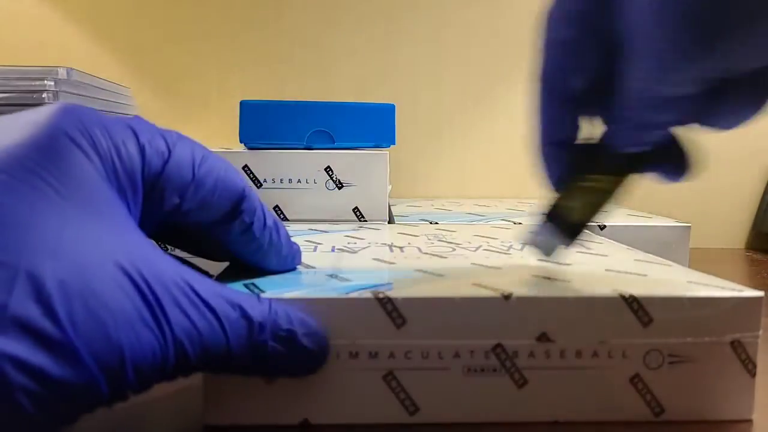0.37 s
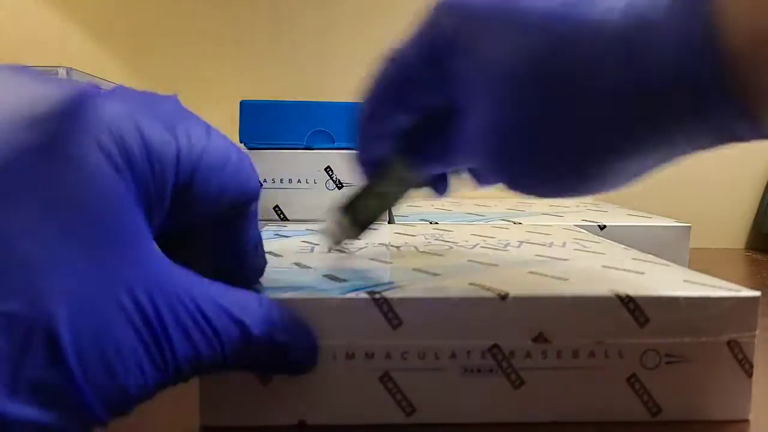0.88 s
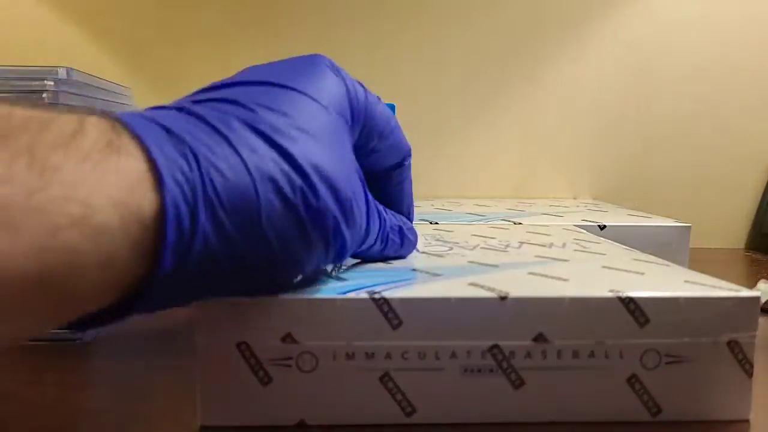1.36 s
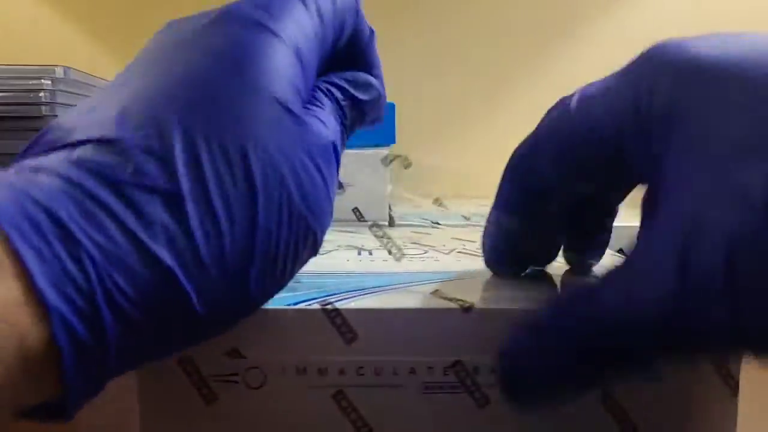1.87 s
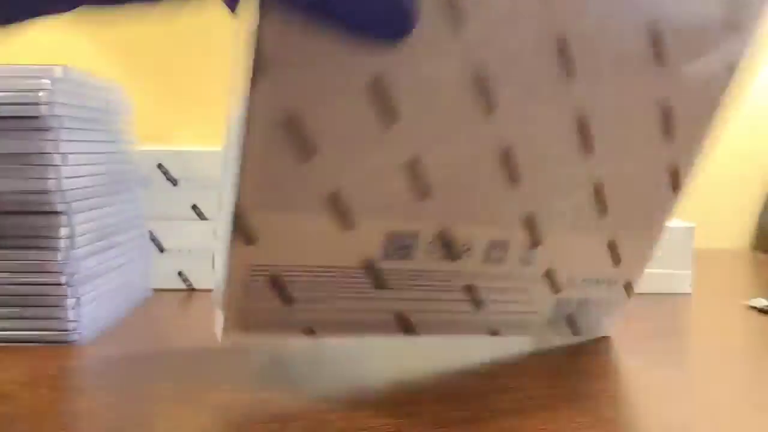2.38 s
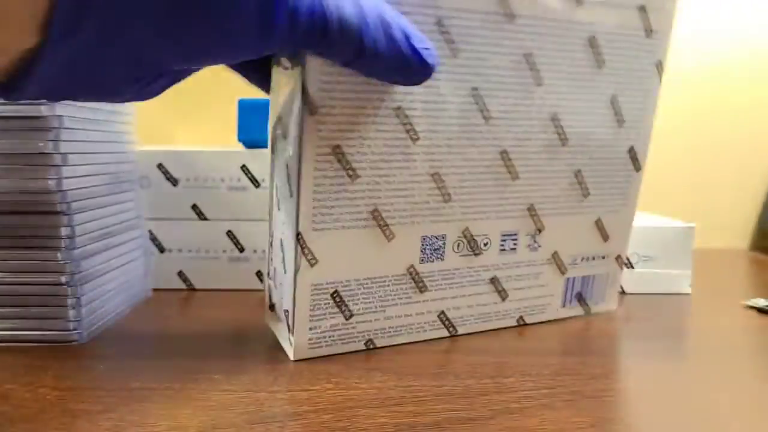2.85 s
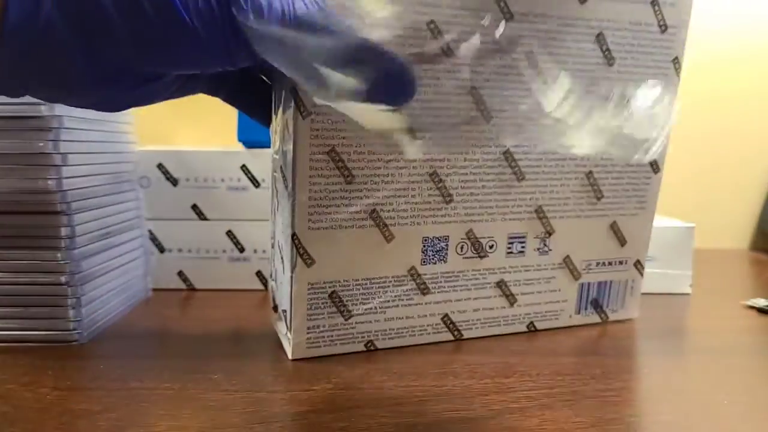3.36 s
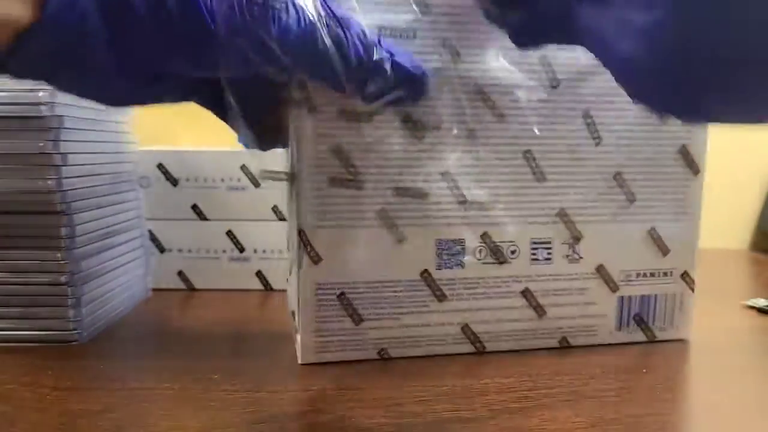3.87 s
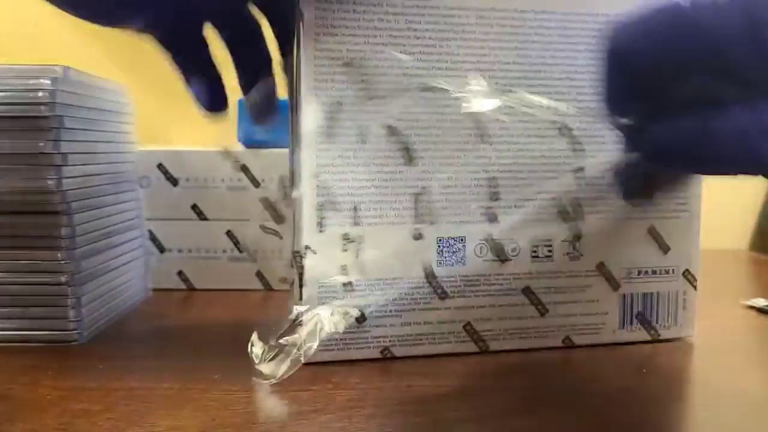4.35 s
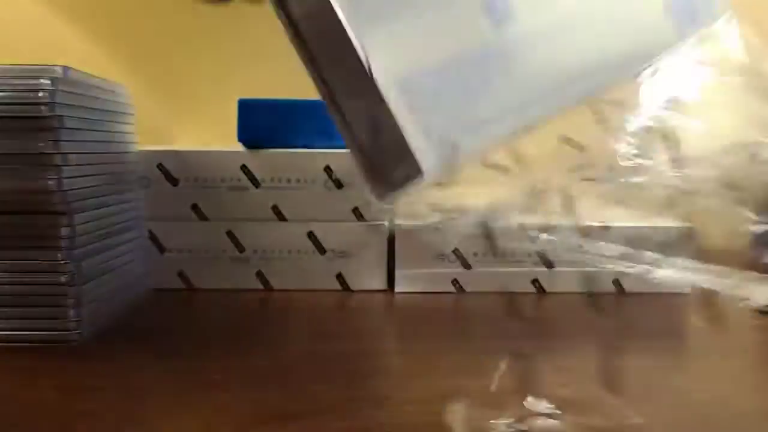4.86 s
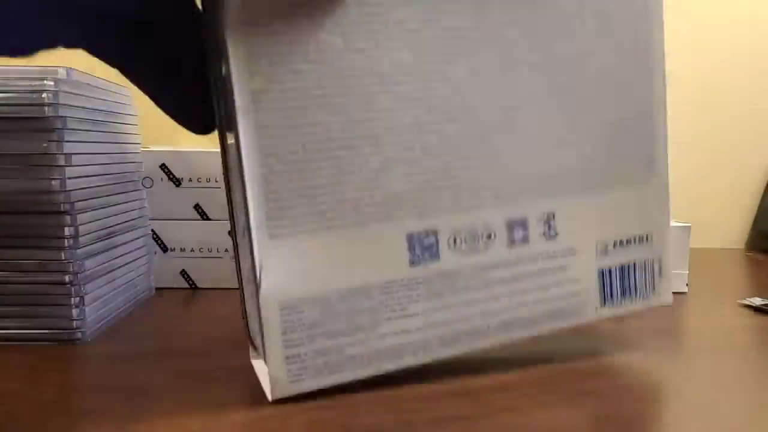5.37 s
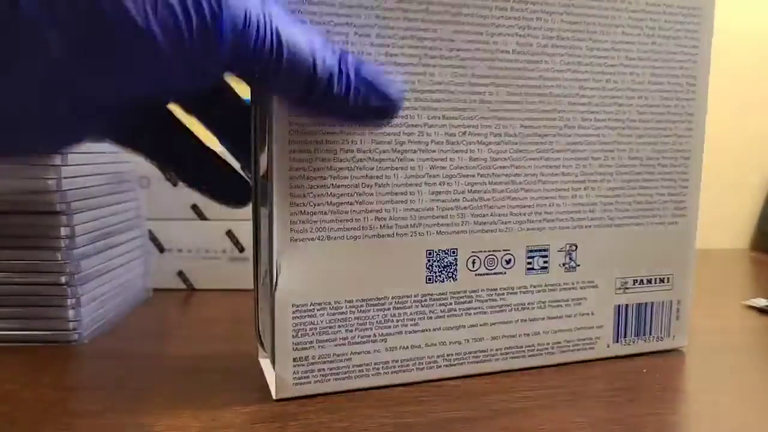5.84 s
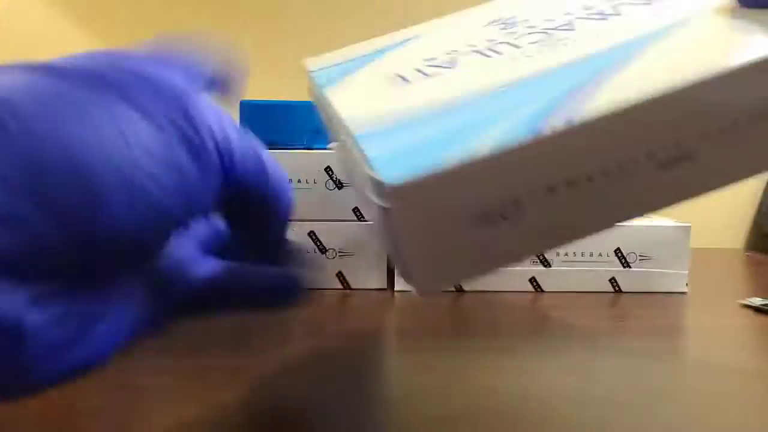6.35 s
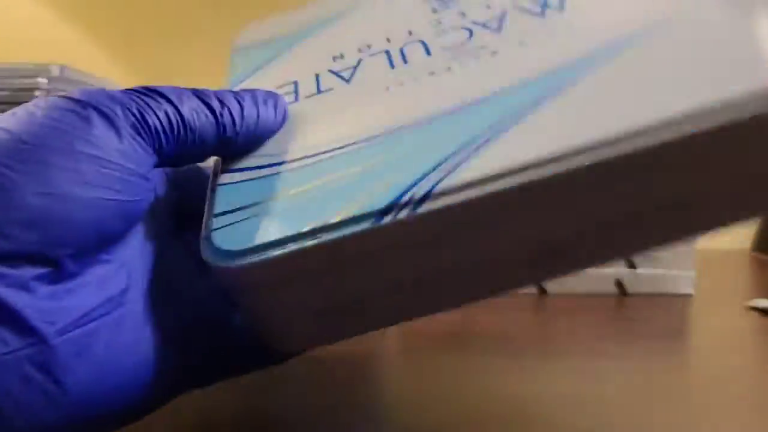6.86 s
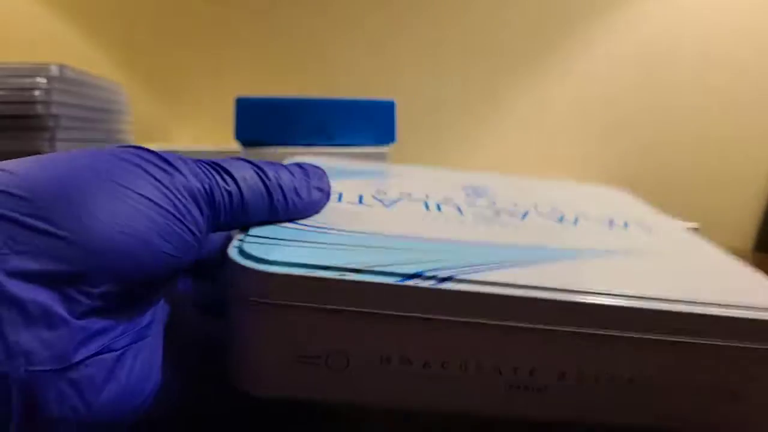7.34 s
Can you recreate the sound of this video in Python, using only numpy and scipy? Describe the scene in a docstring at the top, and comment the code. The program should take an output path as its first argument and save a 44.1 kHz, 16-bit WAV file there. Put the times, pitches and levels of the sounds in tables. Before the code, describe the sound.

A close, dry indoor unwrapping on a wooden desk, with a short small-room echo and faint steady air. A blade drags over plastic film at 0.15-0.5 s, a gritty rasp drumming the hollow box, and again, shorter, at 0.85-1.05 after a knock. Sharp film snaps burst at 1.4, then thin rustle and small crackles continue to 2.1, where snaps cluster with a tiny squeak. The box knocks dully at 2.55; bright pops follow at 2.35 and 2.75-2.85. Lighter crinkles and a faint creak at 3.5 lead to stronger pulls and cracks at 3.75, 4.1, 4.35, 4.5 and 4.9. Rustle thins by 5.5, leaving soft glove rubs and light taps around 6.1-6.3. A card sleeve scrapes off at 6.65-6.9, ending in a bump. The tin lands at 7.4 and 7.5, two bright, hard clacks with short clatter, then a brief hissing slide.

```python
"""Unwrapping a boxed tin

Gloved hands unwrap a tin in a card sleeve on a wooden desk, close to a small microphone.
A blade scores the plastic film twice; the film is pulled off with snaps and rustle, the box knocks
on the desk, the sleeve slides off and the tin is set down, edge first, with a short slide on the desk.
Rubs are filtered noise and tiny slips, blows are fading noise bursts, squeaks are gliding tones; a
small room answers.
"""
import sys
import numpy as np
from scipy import signal
from scipy.io import wavfile
from scipy.ndimage import uniform_filter1d

SR = 44100
rng = np.random.default_rng(int(sys.argv[2]) if len(sys.argv) > 2 else 0)


def amplitude_ratio(level_db):
    """Convert a level in decibels to the matching linear amplitude (field) ratio."""
    exponent = np.asarray(level_db, float) / 20
    return 10 ** exponent


def generate_wav(signal):
    """Clip the signal to [-1, 1] and save it as 16-bit WAV at the path in sys.argv[1]."""
    frames = np.transpose(np.atleast_2d(signal))
    scaled = np.clip(frames, -1, 1) * 32767
    pcm = np.round(scaled).astype(np.int16)
    wavfile.write(sys.argv[1], SR, pcm)


N = 340452  # length in samples

# Held strokes of blade, film and sleeve: touch t/s, lift t/s, build-up time/s of the drumming,
# surface hiss level/dB, box drumming level/dB
BLADE_STROKES = [(0.142, 0.47, 0.072, -23.5, -22.5), (0.85, 1.06, 0.028, -25.5, -25)]
FILM_STROKES = [(1.378, 1.48, 0.0021, -31, -39), (3.03, 3.205, 0.0064, -45.5, -51.5),
                (3.736, 3.875, 0.002, -37.5, -37.5), (3.91, 4.06, 0.011, -38.5, -41.5),
                (4.083, 4.145, 0.0018, -24, -33), (4.755, 4.9, 0.012, -31.5, -37.5),
                (4.95, 5.115, 0.0091, -42.5, -49), (5.29, 5.465, 0.0048, -40.5, -53)]
SLEEVE_STROKES = [(6.66, 6.9, 0.026, -27, -29.5)]
# How held strokes end: time/s to fall 20 dB after the lift, change of drumming level/dB along the stroke
BLADE_END = (0.015, -3)
FILM_END = (0.035, -0.66)
SLEEVE_STOP = (0.0056, -19)
# Short rubs of film, of sleeve and desk, and of gloves: peak t/s, time/s of a 20 dB rise, time/s of a
# 20 dB fall (zero, negative or smaller times are played as 0.002 s),
# surface hiss level/dB, box drumming level/dB
FILM_RUBS = [(1.317, 0.11, 0.35, -55, -41), (1.47, -0.0147, 0.04, -32.5, -43), (1.56, 0.53, 0, -52.5, -56),
             (1.674, -0.03, 0, -35, -36), (1.74, 0.43, 0.14, -45.5, -50.5), (1.88, 1, 0.5, -54, -57),
             (1.96, 0.14, 0.15, -49, -40.5), (2.02, 0.05, 0.24, -43.5, -40),
             (2.096, -0.0248, 0.08, -38, -34.5), (2.25, 0.45, 0, -48.5, -47),
             (2.345, 0.09, 0.1, -39, -35.5), (2.7, 1.5, 0.15, -50.5, -54), (2.85, 0.1557, 0.05, -29.5, -34),
             (3.078, 1.2, -0.45, -46.5, -53), (3.342, 0.07, 1.5, -55.5, -53),
             (3.462, -0.0643, 0, -38.5, -33.5), (3.504, 0.08, 0.07, -39, -49), (3.64, 0.2, 1.3, -50, -50.5),
             (4.23, 0, 1.5, -43.5, -47), (4.37, 0.11, 0.18, -35.5, -35.5), (4.5, -0.0953, 0.08, -23, -29),
             (4.6, 0.5, 0.3, -38.5, -48.5), (4.906, -0.03, 0.0429, -21, -29)]
SLIDE_RUBS = [(6.65, 0.074, 0.03, -38.5, -44), (6.91, 0.023, 0.02, -54.5, -19),
              (7.53, 0.023, 0.13, -34, -17), (7.55, .02, 0.1, -50, -24)]
GLOVE_RUBS = [(0.05, 0.057, 0.081, -80, -49.5), (0.56, 0.084, 0.069, -61, -50.5),
              (1.28, 0.14, 0.015, -64, -53.5), (5.608, 0.0085, 0.05, -54.5, -48.5),
              (5.736, 0.052, 0.05, -48, -50.5), (5.83, 0.046, 0.036, -49, -49.5),
              (5.914, 0.15, 0.082, -52.5, -49), (6.12, 0.011, 0.046, -49, -35.5),
              (6.218, 0.0076, 0.12, -41.5, -36.5), (6.52, 0.09, 0.069, -48.5, -52.5),
              (6.96, 0.027, 0.032, -63, -40), (7.03, 0.08, 0.32, -52, -54.5),
              (7.326, 0.033, 0.083, -58, -51)]
# Colour of each material and of the room air, before the overall level is set: f/Hz, relative level/dB
BLADE_COLOUR = [(24, -116), (40, -76.5), (85, -10), (222, -4.5), (391, -5), (670, -4), (758, -6.5),
                (1360, -8.5), (1740, -11.5), (3910, -15), (8580, -28.5), (14000, -27.5)]
PLASTIC_COLOUR = [(24, -9), (40, 0.5), (79, 9.5), (306, 2), (372, 0), (654, -2.5), (721, 0), (1040, -5),
                  (2340, -11), (7050, -11.5), (8790, -19), (14000, -10)]
SLIDE_COLOUR = [(24, -65), (40, 1), (136, -5.5), (183, -4.5), (313, 4), (464, -3.5), (538, -4.5), (721, -5),
                (1330, -8.5), (1740, -9.5), (3220, -6.5), (7000, -10), (8600, -19), (14000, -14.5)]
TIN_COLOUR = [(35, -76), (72, -20.5), (258, -8), (317, -7), (658, -10), (866, -18.5), (970, -9.5),
              (1110, -10.5), (1400, -12), (2470, -22.5), (6160, -34.5), (7060, -34.5), (8100, -44),
              (14000, -39.5)]
AIR_COLOUR = [(15, -47.5), (25, 6.5), (80, 9.5), (164, -10.5), (649, -15), (2080, -24), (4850, -15),
              (8470, -27.5), (12600, -32), (14000, -8)]
# Walls and air of the box, each sound takes its own share of the lift: f/Hz, width/Hz, lift level/dB
BOX_MODES = [(127.8, 8.3, 3.5), (236.8, 45, 6.5), (318, 22, 8), (409, 7.3, 1.5), (518, 82, 6),
             (665, 81, 7.5), (986, 81, 5), (1360, 390, 5.5), (1947, 24, 7.5)]
# Creases of film snapping: t/s, level/dB, centre f/Hz
FILM_SNAPS = [(0.0266, -38, 4000), (0.3186, -18, 1660), (0.602, -24, 12800), (0.7932, -19.5, 1630),
              (0.9718, -17, 1300), (1.3165, -16, 1640), (1.345, -19, 1930), (1.3814, -2.5, 3000),
              (1.3987, -1, 3100), (1.443, -5.5, 3970), (1.5726, -19, 12400), (1.6621, -20.5, 8100),
              (1.673, -22, 1990), (1.686, -22, 4500), (1.915, -34.5, 2500), (1.9494, -28.5, 2800),
              (2.0038, -22.5, 3430), (2.0535, -20, 3490), (2.08, -9, 12300), (2.090, -19, 6000),
              (2.0992, -7.5, 3850), (2.1232, -14.5, 4080), (2.159, -27, 1290), (2.181, -32, 9000),
              (2.219, -34.5, 6000), (2.315, -28, 2200), (2.3554, -8.5, 3160), (2.379, -25, 6000),
              (2.448, -31, 3800), (2.487, -30, 7000), (2.572, -21, 3260), (2.669, -18, 12700),
              (2.709, -26.5, 4560), (2.7588, -7, 1410), (2.809, -34, 1490), (2.835, -14.5, 5000),
              (2.843, -5.5, 7200), (2.9, -23, 8000), (2.946, -25, 12600), (2.971, -29, 9200),
              (3.017, -32, 9000), (3.053, -24.5, 1520), (3.068, -12.5, 13000), (3.085, -17, 6200),
              (3.171, -36, 5400), (3.193, -28, 3980), (3.293, -40, 5040), (3.3074, -32, 6100),
              (3.327, -36, 3100), (3.535, -30, 3160), (3.605, -25, 12800), (3.6339, -20.5, 12200),
              (3.647, -28.5, 2000), (3.737, -13, 6750), (3.756, -17.5, 1500), (3.765, -11, 6840),
              (3.78, -19, 3300), (3.811, -13.5, 4670), (3.867, -17, 1490), (3.968, -24, 2540),
              (3.934, -22.5, 5370), (3.9493, -24.5, 1500), (3.999, -35, 9000), (4.022, -24, 2230),
              (4.0343, -11.5, 11900), (4.076, -15.5, 3000), (4.0828, -1.5, 2470), (4.142, -8.5, 3380),
              (4.204, -11, 12900), (4.2847, -25, 3350), (4.31, -24, 2500), (4.325, -31, 4000),
              (4.3328, -1.5, 2410), (4.368, -18.5, 1510), (4.435, -21, 4500), (4.481, 2, 5070),
              (4.641, -36, 8000), (4.657, -27.5, 4000), (4.6937, -21, 1440), (4.738, -24, 4070),
              (4.763, -24, 5200), (4.8645, -17.5, 3760), (4.901, -10.5, 6950), (4.981, -27, 10000),
              (4.994, -34, 7000), (5.019, -18, 11700), (5.107, -19, 12700), (5.215, -19.5, 12300),
              (5.252, -28, 12400), (5.297, -31.5, 3670), (5.3295, -16.5, 12600), (5.386, -23.5, 12800),
              (5.456, -24, 12400), (5.9027, -26.5, 4200), (6.1125, -20.5, 5700), (6.2221, -20, 2350),
              (6.264, -23.5, 2320), (6.31, -12, 12500), (6.7229, -17.5, 1930), (7.051, -29, 3700)]
# Knocks of fingers and desk on the box, heard 4 ms after the listed time:
# t/s, level/dB, centre f/Hz, time/s of a 60 dB fall, fall above the centre/dB per octave
BOX_KNOCKS = [(0.025, -41.5, 304, 0.079, 4.5), (0.788, -15.5, 670, 0.15, 25), (0.96, -13.5, 706, 0.2, 4.5),
              (1.312, -21.5, 1160, 0.021, 4), (1.726, -30.5, 117, 0.12, 7), (1.953, -25, 121, 0.071, 21),
              (2.011, -28, 920, 0.24, 13), (2.016, -25, 170, 0.044, 15), (2.093, -22, 1240, 0.019, 8.5),
              (2.312, -31.5, 580, 0.34, 9), (2.564, -13, 145, 0.069, 8), (2.611, -30.5, 160, 0.11, 12.5),
              (2.662, -32, 490, 0.17, 11.5), (2.75, -20.5, 660, 0.043, 12), (3.049, -36.5, 660, 0.22, 5.5),
              (3.332, -33.5, 118, 0.078, 7), (3.655, -41, 100, 0.097, 18), (3.732, -16, 227, 0.16, 12.5),
              (3.833, -25.5, 217, 0.18, 20), (4.083, -15.5, 324, 0.22, 11), (4.332, -21, 318, 0.067, 22.5),
              (4.476, -17.5, 228, 0.18, 6.5), (6.12, -22.5, 102, 0.12, 10.5), (6.217, -26.5, 610, 0.24, 31),
              (6.302, -20, 243, 0.025, 7.5), (6.668, -25.5, 302, 0.22, 20), (6.901, -27, 1080, 0.1, 11),
              (6.901, -17.5, 259, 0.038, 32)]
# The tin lands, heard 1 ms after the listed time:
# t/s, dull blow level/dB, bright crack level/dB above the dull blow, dull clatter time/s of a 60 dB fall
TIN_LANDINGS = [(7.375, -9, 6.5, 0.19), (7.504, -6.5, 5.5, 0.18)]
# Squeaks of rubber, film and card under drag: start t/s, length/s, from f/Hz, to f/Hz, level/dB
DRAG_SQUEAKS = [(0.652, 0.065, 1340, 1410, -59), (0.731, 0.033, 1406, 950, -65.5),
                (2.011, 0.053, 771, 1205, -36.5)]
# The glove sticks and slips on the film: start t/s, length/s, from f/Hz, to f/Hz, level/dB of the stack
GLOVE_CREAK = (3.5, 0.055, 511, 488.5, -38)
# Tones at 1, 2, 3.. times the slip rate: relative level/dB
SLIP_TONES = [-5.5, 0.5, -10, -14, -21, -7]
# Surfaces under drag sing in a narrow band: start t/s, length/s, from f/Hz, to f/Hz, level/dB
SINGING_BANDS = [(0.389, 0.043, 617, 665, -25), (0.865, 0.1, 684, 598, -26), (0.946, 0.052, 670, 666, -23),
                 (0.869, 0.16, 1310, 1320, -32), (2.079, 0.04, 1220, 1220, -33),
                 (6.657, 0.031, 572, 613, -26.5), (6.69, 0.096, 455, 577, -37),
                 (6.811, 0.13, 1240, 1360, -38.5), (6.866, 0.016, 3070, 3400, -23.5),
                 (7.516, 0.14, 6900, 6500, -41.5), (7.563, 0.2, 2220, 1850, -41),
                 (7.622, .14, 5560, 5800, -46)]
# Centres of the tiny slips: f/Hz
SLIP_CENTRES = [600, 1200, 2300, 3800, 6000, 9500, 13000]

HZ = np.fft.rfftfreq(4096, 1 / SR)  # frequencies at which colours are given
MS = np.arange(0, N / SR, .001)  # time in seconds, in steps of 1 ms
SPLIT_HZ = 1500  # the drumming lies below, the hiss above


def evened(x):
    """Scales a sound to an average (rms) strength of 1."""
    return x / np.sqrt(np.mean(x ** 2) + 1e-20)


def read(points, hz):
    """Reads a colour between its points, on a log frequency axis."""
    f, value = np.transpose(points)
    return np.interp(np.log(hz + 1), np.log(f + 1), value)


def add(mix, s, sound):
    """Mixes a sound in at s seconds."""
    part = mix[round(s * SR):][:len(sound)]
    part += sound[:len(part)]


def wander(count, smoothing):
    """Slow random ups and downs, made by averaging noise over the given number of samples."""
    return evened(uniform_filter1d(rng.standard_normal(count), size=smoothing))


def box_db(hz):
    """Lift that the box resonances give at each frequency."""
    return sum(db / (1 + (2 * (hz - f) / width) ** 2) for f, width, db in BOX_MODES)


def coloured(x, db):
    """Filters a sound to the colour db, given at HZ, without sounding ahead of its cause."""
    both_sides = np.r_[db, db[-2:0:-1]]
    log_gain = np.log(amplitude_ratio(np.maximum(both_sides, -100)))
    taps = np.fft.ifft(np.exp(np.conj(signal.hilbert(log_gain)))).real
    return signal.oaconvolve(x, taps)[:len(x)]


def patchy(x, patchy_db, size):
    """Random louder and softer patches; longer frames give narrower, slower ones."""
    overlap = size * 3 // 4
    z = signal.stft(x, nperseg=size, noverlap=overlap)[2]
    field = uniform_filter1d(rng.standard_normal(z.T.shape), size=10, axis=0)
    field = uniform_filter1d(field, size=4, axis=1)
    z = z * amplitude_ratio(patchy_db * evened(field).T)
    return signal.istft(z, nperseg=size, noverlap=overlap)[1][:len(x)]


def grains(per_s, spread_db, length):
    """Slips of many sizes: short puffs, each about two octaves wide around its own centre."""
    out, t = np.zeros(N), np.arange(512) / SR
    for hz in SLIP_CENTRES * 2:
        hit = rng.random(N) < per_s / SR / len(SLIP_CENTRES) / 2
        train = rng.choice([-1., 1.], N) * hit
        train *= amplitude_ratio(spread_db * np.minimum(rng.exponential(1, N), 3.5))
        burst = rng.standard_normal(len(t)) * np.exp(-t / length)
        puff = coloured(burst, -6. * np.log2((HZ + 20) / hz) ** 2)
        out += signal.oaconvolve(train, evened(puff) * np.sqrt(hz))[:N]
    return evened(out)


def rubbing(gains, colour, per_s, spread_db, smooth, clump_db, patchy_db, size):
    """Slips of many sizes over smooth friction; they drum the box below the split and hiss above it."""
    slips = grains(per_s, spread_db, length=0.00074)
    drive = np.sqrt(smooth) * rng.standard_normal(N) + np.sqrt(1 - smooth) * slips
    clumps = evened(uniform_filter1d(uniform_filter1d(rng.standard_normal(N), size=300), size=300))
    drive = patchy(drive * amplitude_ratio(clump_db * clumps), patchy_db, size)
    low_db = -10 * np.log10(1 + (HZ / SPLIT_HZ) ** 3)
    high_db = -10 * np.log10(1 + (SPLIT_HZ / (HZ + 1)) ** 3)
    body_db = read(colour, HZ) + box_db(HZ)
    drumming, hiss = [evened(coloured(drive, body_db + db)) for db in (low_db, high_db)]
    return gains[0] * drumming + gains[1] * hiss


def swell(peak, rise, fall):
    """Gain that climbs to 1 at the peak and dies away; rise and fall are seconds per 20 dB."""
    before = np.maximum((peak - MS) / max(rise, .002), 0)
    after = np.maximum((MS - peak) / max(fall, .002), 0)
    bend = 0.92  # 1 = straight fades in dB, more = rounder peaks
    return amplitude_ratio(-20 * np.minimum(before + after, 8) ** bend)


def tugs(rows):
    """Shapes and levels of rubs that peak once."""
    return [(*[swell(s, rise, fall)] * 2, *dbs) for s, rise, fall, *dbs in rows]


def held(rows, fall, fade_db):
    """Strokes that build up from the touch, hold, and stop at the lift."""
    out = []
    hiss_lag = 1.57  # the hiss builds this many times slower than the drumming
    for touch, lift, build, *dbs in rows:
        since, stop = np.maximum(MS - touch, 0), swell(lift, np.inf, fall)
        drum, hiss = [(1 - np.exp(-since / max(b, .001))) ** 2 * stop for b in (build, hiss_lag * build)]
        fade = amplitude_ratio(fade_db * np.minimum(since / (lift - touch), 1))
        out.append((drum * fade, hiss, *dbs))
    return out


def pressure(shapes):
    """Adds up the power of all strokes and gives the drumming and hiss gains for every sample."""
    drum = sum((a * amplitude_ratio(drum_db)) ** 2 for a, b, hiss_db, drum_db in shapes)
    hiss = sum((b * amplitude_ratio(hiss_db)) ** 2 for a, b, hiss_db, drum_db in shapes)
    return [np.interp(np.arange(N) / SR, MS, np.sqrt(p)) for p in (drum, hiss)]


def blow(db, t60, colour_db, crack, tail_db, rise):
    """A crack, then a noisy tail, through the colour of the struck thing; times are in seconds."""
    t = np.arange(12000) / SR
    shape = (1 - np.exp(-t / rise)) * (np.exp(-t / crack) + amplitude_ratio(tail_db - 60 * t / t60))
    sound = coloured(shape * rng.standard_normal(len(t)), colour_db)
    loudest = np.sqrt(uniform_filter1d(sound ** 2, size=round(crack * SR) + 1).max())
    return amplitude_ratio(db) * sound / (2 * loudest)


def air():
    """Quiet, steady air of the room: coloured noise with slightly louder and softer patches."""
    noise = coloured(rng.standard_normal(N), read(AIR_COLOUR, HZ))
    return amplitude_ratio(-58) * evened(patchy(noise, 1.5, size=512))


def room(x):
    """Short echo of a small furnished room: noise that fades at a pace set for each frequency."""
    hz, t, z = signal.stft(rng.standard_normal(SR // 2), SR, nperseg=256)
    t60 = read([(100, 0.23), (1000, 0.19), (10000, 0.2)], hz)  # f/Hz, time/s of a 60 dB fall
    tail = signal.istft(z * amplitude_ratio(-60 * t / t60[:, None]), SR, nperseg=256)[1]
    tail[:200] = 0
    return signal.fftconvolve(x, tail / np.linalg.norm(tail))[:N]


def gloves():
    """Gloves shifting on the box: short, mostly smooth rubs."""
    return rubbing(pressure(tugs(GLOVE_RUBS)), PLASTIC_COLOUR, per_s=1500, spread_db=3.2,
                   smooth=.75, clump_db=1.6, patchy_db=1.3, size=256)


def squeaks():
    """Thin, rough tones that glide, with weaker partners at a third of the pitch and an octave up."""
    out = np.zeros(N)
    for s, length, from_hz, to_hz, db in DRAG_SQUEAKS:
        u = np.arange(0, length, 1 / SR) / length  # 0 to 1 along the squeak
        waver = 1 + .035 * wander(4000, 200)[:len(u)]
        arch = 1 + 0.07 * np.sin(np.pi * u)  # the pitch bows up in mid squeak
        turns = 2 * np.pi * np.cumsum((from_hz + (to_hz - from_hz) * u) * arch * waver) / SR
        tone = np.sin(turns) + amplitude_ratio(-8) * np.sin(turns / 3) + amplitude_ratio(-17) * np.sin(2 * turns)
        grip = amplitude_ratio(3.7 * wander(4000, 100)[:len(u)])
        add(out, s, np.sqrt(2) * amplitude_ratio(db) * grip * tone * np.sin(np.pi * u ** 0.3))
    return out


def creak():
    """The glove sticks and slips on the film; uneven slips give a rough stack of tones."""
    s, length, from_hz, to_hz, db = GLOVE_CREAK
    out, u = np.zeros(N), np.arange(0, length, 1 / SR) / length
    waver = 1 + .07 * wander(4000, 200)[:len(u)]
    unsteady = uniform_filter1d(rng.standard_normal((len(SLIP_TONES), 4000)), size=150)
    grip = amplitude_ratio(3.5 * evened(unsteady)[:, :len(u)])
    turns = 2 * np.pi * np.cumsum((from_hz + (to_hz - from_hz) * u) * waver) / SR
    stack = sum(amplitude_ratio(v) * grip[k] * np.sin((k + 1) * turns + k * k) for k, v in enumerate(SLIP_TONES))
    add(out, s, amplitude_ratio(db) * np.sin(np.pi * u) * stack)
    return out


def singing():
    """Friction noise through a resonance that drifts while the stroke lasts."""
    out = np.zeros(N)
    for s, length, from_hz, to_hz, db in SINGING_BANDS:
        u = np.arange(0, length, 1 / SR) / length
        waver = 1 + .04 * wander(12000, 600)[:len(u)]
        turn = np.exp(2j * np.pi * np.cumsum((from_hz + (to_hz - from_hz) * u) * waver) / SR)
        r = np.exp(-np.pi * 0.074 * from_hz / SR)  # band width is 0.074 of the starting pitch
        noise = rng.standard_normal(12000)[:len(u)]
        # turn the noise down to 0 Hz, smooth it there, turn it back up
        band = (turn * signal.lfilter([1 - r], [1, -r], noise / turn)).real
        add(out, s, amplitude_ratio(db) * evened(band) * np.sin(np.pi * u) ** 1.36)
    return out


def knocks():
    """Dull blows that ring the box modes, most of all those near their centre."""
    out, t = np.zeros(N), np.arange(12000) / SR
    for s, db, hz, t60, fall_db in BOX_KNOCKS:
        octaves = np.log2((HZ + 20) / hz)
        colour_db = 1.95 * np.minimum(octaves, 0) - fall_db * np.maximum(octaves, 0) + 1.05 * box_db(HZ)
        add(out, s + .004, blow(db, t60, colour_db, crack=.006, tail_db=-4, rise=.0015))
        ring = np.zeros(len(t))
        for (f, _, _), phase in zip(BOX_MODES, rng.random(len(BOX_MODES))):
            ring += amplitude_ratio(np.interp(f, HZ, colour_db)) * np.sin(2 * np.pi * (f * t + phase))
        fade = amplitude_ratio(db - 5.5 - 60 * t / t60) * (1 - np.exp(-t / .002))
        add(out, s + .004, fade * evened(ring) / 2)
    return out


def slides():
    """The card sleeve slides off, and after the landing there is a short slide on the desk:
    dense slips in one held stroke and short rubs."""
    strokes = held(SLEEVE_STROKES, *SLEEVE_STOP) + tugs(SLIDE_RUBS)
    return rubbing(pressure(strokes), SLIDE_COLOUR, per_s=3000, spread_db=2.1,
                   smooth=.7, clump_db=1.0, patchy_db=1.9, size=512)


def tin():
    """The blow, then lid and contents clatter; the treble dies first."""
    out = np.zeros(N)
    colour_db = read(TIN_COLOUR, HZ) + 0.57 * box_db(HZ)
    low_db = -10 * np.log10(1 + (HZ / SPLIT_HZ) ** 2)
    for s, db, bright_db, t60 in TIN_LANDINGS:
        dull = blow(db, t60, colour_db + low_db, crack=0.0013, tail_db=10, rise=0.0052)
        bright = blow(db + bright_db, 0.26 * t60, colour_db + 0.074 * low_db,
                      crack=0.00164, tail_db=8, rise=0.00078)
        add(out, s + 0.001013, dull)
        add(out, s + 0.001105, bright)
    return out


def cuts():
    """A blade scores the film: held strokes of friction noise and slips."""
    return rubbing(pressure(held(BLADE_STROKES, *BLADE_END)), BLADE_COLOUR, per_s=2500, spread_db=3.2,
                   smooth=.4, clump_db=1.8, patchy_db=2.6, size=512)


def snaps():
    """Creases of film snap: broad, bright clicks around their own centres; the small are narrower."""
    out = np.zeros(N)
    for s, db, hz in FILM_SNAPS:
        slope = 3.5 - 0.074 * min(db, 0)  # dB per octave away from the centre
        lean_db = -slope * abs(np.log2((HZ + 20) / hz))
        colour_db = lean_db + read(PLASTIC_COLOUR, np.maximum(HZ, 2000))
        add(out, s, blow(db, .028, colour_db, crack=.0004, tail_db=-16, rise=.0002))
    return out


def film():
    """The film is torn and pulled off: sparser slips in held pulls and short rubs make the rustle."""
    strokes = held(FILM_STROKES, *FILM_END) + tugs(FILM_RUBS)
    return rubbing(pressure(strokes), PLASTIC_COLOUR, per_s=900, spread_db=2.3,
                   smooth=0.47, clump_db=1.0, patchy_db=3.5, size=256)


def scene():
    """All that the hands do, the room's answer and its quiet air."""
    near = gloves() + squeaks() + creak() + singing() + knocks()
    near = near + slides() + tin() + cuts() + snaps() + film()
    return (near + amplitude_ratio(-9.5) * room(near) + air())[None]


def low_pass(x):
    """Removes everything above the highest recorded frequency."""
    return signal.sosfilt(signal.butter(12, 14930, fs=SR, output="sos"), x)


def record(dry):
    """The microphone loses deep bass, a gate lowers quiet moments, the input rounds off hard peaks."""
    bass_hz, edge_hz = 52, 13950
    thin = signal.sosfilt(signal.butter(4, bass_hz, "high", fs=SR, output="sos"), dry)
    level_db = 10 * np.log10(abs(uniform_filter1d(thin ** 2, size=1500)) + 1e-12)
    # below -56 dB the gate cuts 1 dB for each dB, 11 dB at most
    gated = thin * amplitude_ratio(-np.clip(-56 - level_db, 0, 11))
    rounded = .75 * np.tanh(gated / .75)
    edge = signal.firwin(301, edge_hz, window=("kaiser", 6), fs=SR)  # takes off the highest treble
    mix = signal.oaconvolve(rounded, edge[None], "same")
    return low_pass(mix)


dry = scene()
out = record(dry)
generate_wav(out)
```